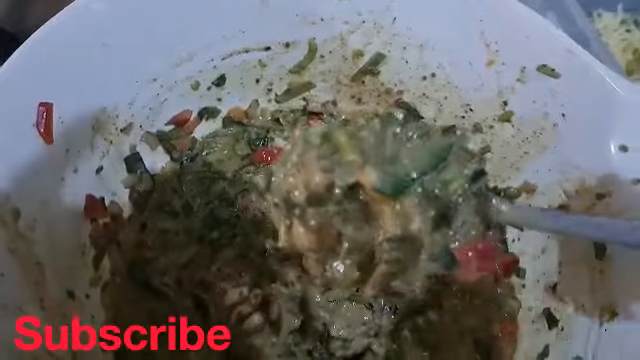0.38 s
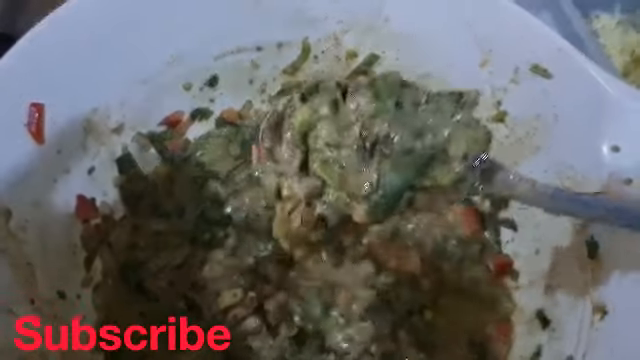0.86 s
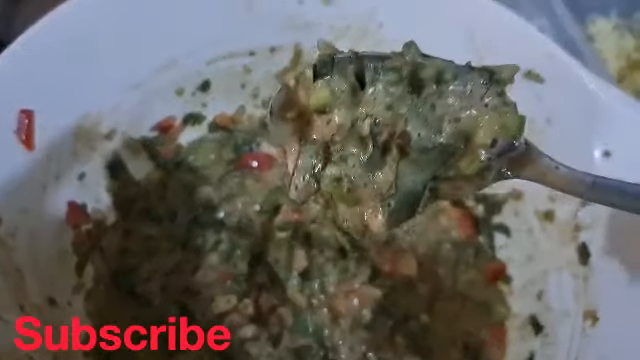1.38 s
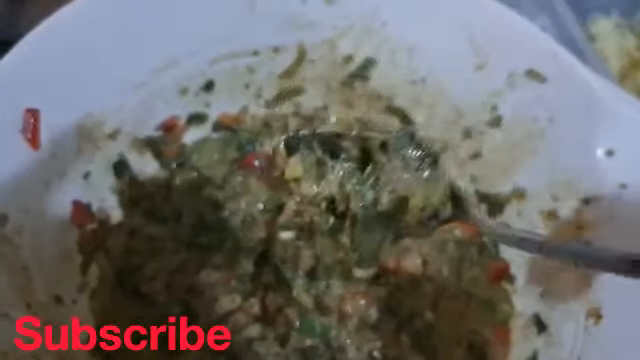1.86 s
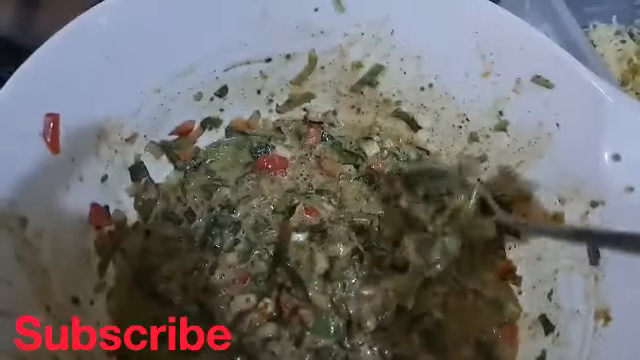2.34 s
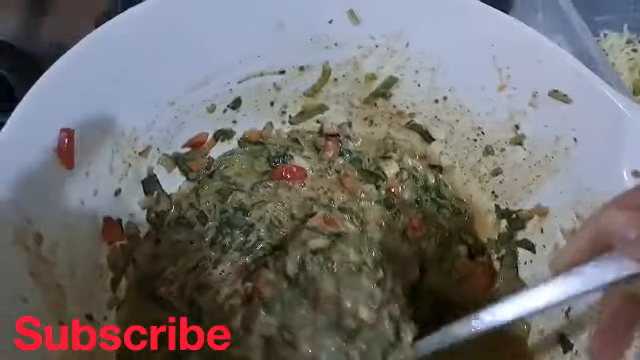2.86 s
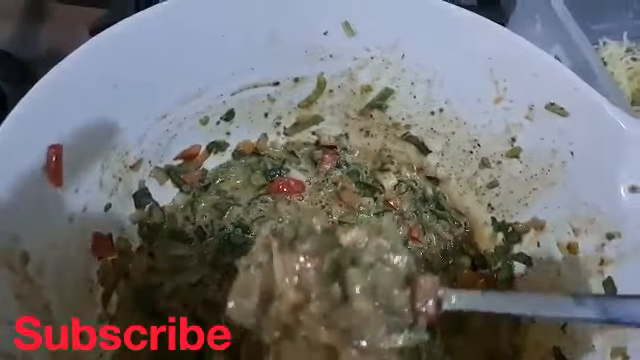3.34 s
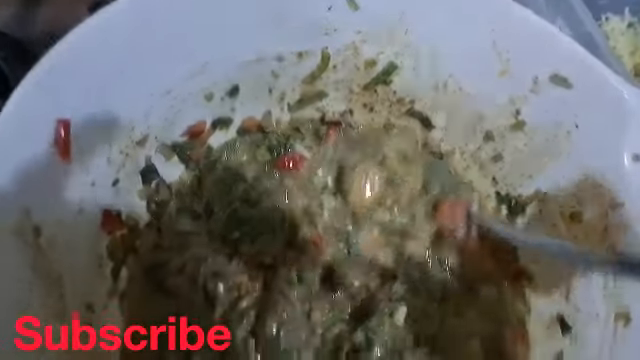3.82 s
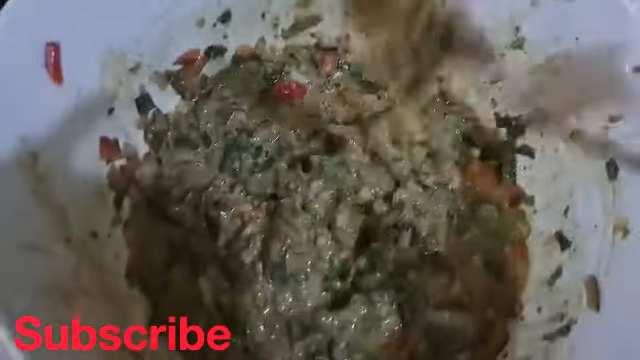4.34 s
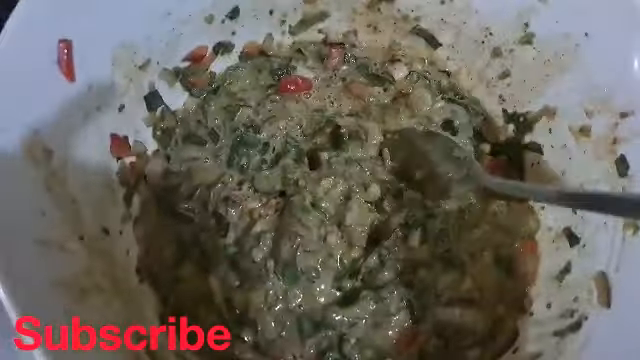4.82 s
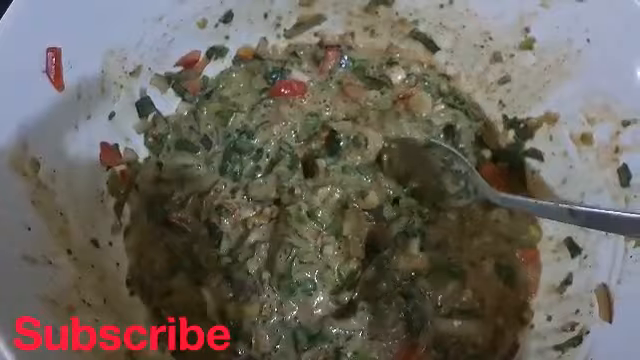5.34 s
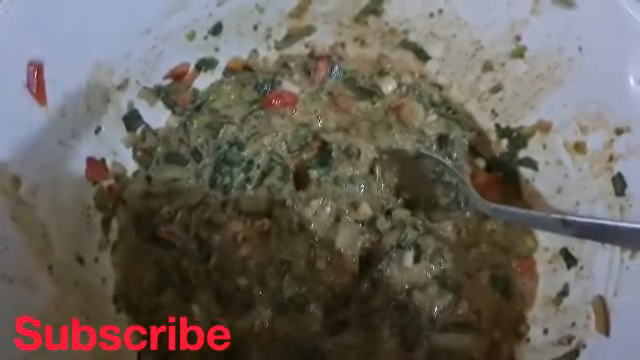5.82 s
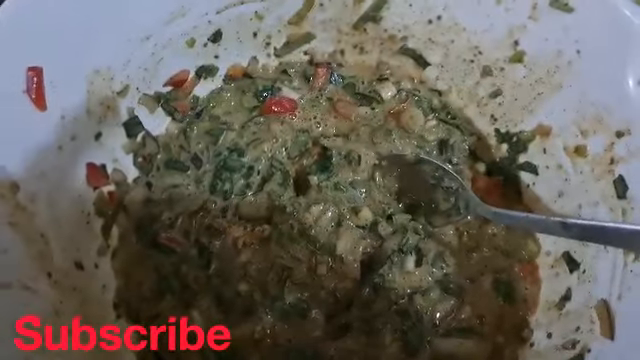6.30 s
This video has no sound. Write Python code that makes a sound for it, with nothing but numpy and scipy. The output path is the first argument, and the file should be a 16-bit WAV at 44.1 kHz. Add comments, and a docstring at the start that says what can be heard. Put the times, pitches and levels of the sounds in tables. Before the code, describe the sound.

Close wet squelching of heavy batter being turned by a metal spoon, faint running-water hiss and fridge hum, then a hard clack and near quiet.

```python
"""A spoon folds thick wet batter in a bowl close to a phone: crowds of short damped grains make soft squelches,
lone pockets ring as plops and sharp snaps tear; a knock and a clink on the bowl ring sets of damped modes.
Farther off, coloured noise hisses like a running tap until something is set down with a clack; a fridge hums.
The two microphone ports hear each source at their own level and time. The sound drops out for an instant
before the clack and ends just before the close."""
import sys
import numpy as np
from scipy import signal
from scipy.fft import rfft, irfft, next_fast_len
from scipy.io import wavfile
from scipy.ndimage import uniform_filter1d, map_coordinates

SR = 44100
rng = np.random.default_rng(int(sys.argv[2]) if len(sys.argv) > 2 else 0)


def store_pcm(level_fs):
    """Save levels as 16-bit WAV."""
    pcm = np.round(np.clip(level_fs, -1, 1) * 32767).astype(np.int16)
    wavfile.write(sys.argv[1], SR, np.atleast_2d(pcm).T)


def voltage_ratio(decibels):
    """Convert decibels (scalar or array-like) to amplitude ratios, 20 dB per decade."""
    exponent = np.asarray(decibels, float) / 20
    return 10 ** exponent


N = 295189

# Kitchen noise colour: (frequency [Hz], relative gain [dB])
KITCHEN_COLOUR = [(290, -32), (500, -21.5), (553, -0.5), (640, -40.5), (750, -24.5), (960, -31.5),
                  (1420, -5.5), (1770, -10.5), (2070, -4), (2700, -24.5), (3500, -39), (4500, -22),
                  (7310, -15.5), (12700, -12.5), (16000, -21)]
# Rumble band, then hum band: (centre [Hz], half width to 1/e [Hz])
HUM_BANDS = [(58, 21), (101, 8.9)]
# Dull bumps through the worktop: (time of peak [s], level [dB], fall t60 [s])
BUMPS = [(1.25, -48, 0.5), (1.84, -46.5, 0.19), (3.12, -56, 0.73), (3.64, -56, 0.44), (4.3, -58.5, 0.5),
         (5.27, -56, 0.28), (6.5, -49.5, 0.81)]
# One deep thud of the worktop: (time of peak [s], level [dB], frequency [Hz], Gaussian half width [s])
WORKTOP_THUD = (5.017, -34, 58.5, .028)
# Flow of the tap: (time [s], hiss level [dB], splash level over the hiss [dB])
TAP_FLOW = [(0, -54, -4.5), (.15, -53, -14.5), (.76, -51, -9.5), (1.15, -53.5, -11), (1.205, -45.5, -7.5),
            (1.29, -47, -3.5), (1.39, -47.5, -5), (1.54, -53.5, -8.5), (3.0, -54.5, -17),
            (3.07, -49.5, -7.5), (3.4, -55, -10.5), (5.36, -55.5, -27), (5.44, -71.5, -16),
            (5.6, -78.5, -20)]
# Colour of the tap's hiss, and of the spits: (frequency [Hz], relative gain [dB])
HISS_COLOUR = [(710, -62.5), (1200, -12.5), (1770, -3), (3950, -6.5), (6800, -0.5), (10500, -5),
               (12600, -5), (15000, -1), (16000, -60)]
# Narrow bands in the hiss: (centre [Hz], half width [Hz], boost [dB])
WHISTLES = [(1827, 18, 8), (6900, 79, 7.5), (11100, 27, 9.5), (12410, 130, 9.5), (13800, 130, -3.5)]
# Colour of the tap's splash: (frequency [Hz], relative gain [dB])
SPLASH_COLOUR = [(500, -23.5), (750, -4.5), (1500, -9), (3300, -7.5), (5500, -6), (9000, -50), (15000, -44)]
# Likeness of the two ports in spread-out noise: (frequency [Hz], left-right likeness [0-1])
PORT_LIKENESS = [(60, 0.94), (130, 0.81), (240, 1), (950, 0.099), (3770, 0.033), (15000, 0.01)]
# Level difference of the microphone ports: (frequency [Hz], left over right [dB])
PORT_BALANCE = [(60, 1), (180, 0), (550, -4), (1650, -1.5), (4970, -4), (15000, 5.5)]
# Decay of the kitchen's answer: (frequency [Hz], t60 [s])
WALL_DECAY = [(200, 0.018), (2000, 0.24), (10000, 0.04)]
# Knock blows: (time [s], level [dB], rattle level over the push [dB], left over right [dB])
KNOCKS = [(2.7948, -36.5, -26.5, 5)]
# Clink blows: (time [s], level [dB], rattle level over the push [dB], left over right [dB])
CLINKS = [(2.9548, -26.5, -20.5, 0.0024), (2.968, -39.5, -25.5, 0)]
# Clack blows: (time [s], level [dB], rattle level over the push [dB], left over right [dB])
CLACKS = [(5.2138, -26, -24, -4.5), (5.2156, -33.5, -24.5, -4.5), (5.2305, -36, -27, -5.5),
          (5.245, -42, -30.5, -7.5), (5.262, -47, -24, -6.5)]
# Broad gritty noise under clink and clack: (time [s], level [dB], rattle over the push [dB], left over right [dB])
CRACKS = [(2.9538, -41, -2.5, 1), (5.214, -35, -2.5, -5), (5.23, -36, -4.5, 0), (5.255, -42.5, -1, -5)]
# Ringing modes of the bowl: (frequency [Hz], relative level [dB], t60 [s])
BOWL_MODES = [(215, -1.5, 0.053), (300, 2, 0.057), (490, 7, 0.036), (595, 7.5, 0.016), (800, 12, 0.018),
              (1160, 1.5, .012), (1580, 9, 0.0073), (1990, -10.5, .015), (1750, -9, 0.04),
              (2450, 1.5, 0.019), (3600, -7.5, 0.0093), (4700, -6.5, 0.0128), (5460, -9.5, 0.0101)]
# Ringing modes of the spoon: (frequency [Hz], relative level [dB], t60 [s])
SPOON_MODES = [(620, -8.5, 0.011), (1100, -16, 0.0051), (1786, -4, 0.03), (1870, 1.5, 0.039),
               (1967, -4.5, 0.049), (2270, -15, .04), (2360, -1, 0.04), (2450, -3, 0.022),
               (2500, -5.5, 0.081), (2660, -8.5, 0.047), (3120, -9, 0.044), (3320, -19, 0.057),
               (3850, -10, 0.013), (4510, -9, 0.046), (5030, -8.5, 0.016), (6170, -25.5, .015),
               (7740, -3, 0.016), (9040, -21, 0.011)]
# Ringing modes of the clack: (frequency [Hz], relative level [dB], t60 [s])
CLACK_MODES = [(298.3, -13, 0.13), (458, -14.5, 0.12), (563, -18, 0.12), (795, -9, 0.15), (920, -13.5, .02),
               (1169, -10, 0.18), (1242, -9, .09), (1383, -10.5, 0.12), (1620, -9, .015),
               (1775, -4.5, 0.071), (1876, -12, .08), (1995, -5.5, 0.063), (2120, -1, 0.039),
               (2340, 8, 0.018), (2450, -25.5, 0.087), (2790, -0.5, 0.015), (3180, 0.5, 0.025),
               (3620, 1.5, 0.018), (3950, 3.5, 0.016), (4400, -3, 0.021), (5220, 2.5, 0.007),
               (6060, -10, 0.008), (7850, 1, 0.0076)]
# Short treble spits as batter slaps or a thing is struck: (time of peak [s], level [dB], fall t60 [s])
SPITS = [(1.95, -53.5, 0.22), (2.09, -55.5, 1), (2.795, -51, 0.21), (2.958, -46, 0.16), (3.62, -51, 0.16),
         (3.88, -47, 0.3), (4.16, -51, 0.12), (5.218, -41.5, 0.18)]
# Heaves of the whole mass of batter: (time of peak [s], level [dB], fall t60 [s])
HEAVES = [(.07, -49.5, 0.24), (1.0, -58.5, 11), (1.3, -60.5, 1.6), (1.75, -52, 0.44), (2.22, -62, 3.9),
          (2.795, -54, 0.79), (3.12, -56, 1.2), (3.4, -59, 0.85), (3.64, -47, 0.21), (3.88, -55, 0.56),
          (4.15, -46, 1.1), (4.43, -62, 27), (5.0, -50.5, 0.42), (5.25, -46, 0.2), (5.44, -59.5, 0.93),
          (5.66, -54.5, 0.2), (5.83, -56.5, 0.24), (6.22, -63, 0.84)]
# Colour of the churning batter: (frequency [Hz], relative gain [dB])
CHURN_COLOUR = [(120, 0.5), (150, 1.5), (200, -7), (320, 1), (480, -5), (620, -18), (1000, -23.5),
                (2500, -50)]
# Sharp wet snaps as the batter tears: (time [s], level [dB])
SNAPS = [(1.32, -48), (1.395, -50), (1.729, -38), (2.071, -43.5), (2.091, -51), (3.599, -33.5),
         (3.861, -41), (3.877, -45), (3.886, -43), (3.95, -41.5), (3.906, -56), (3.925, -55), (4.02, -60),
         (4.05, -44.5), (4.092, -37.5), (4.131, -37.5), (4.137, -35.5), (4.152, -44), (4.166, -48),
         (4.182, -38.5), (4.196, -55), (4.242, -41.5), (4.325, -48)]
# Ringing modes of a snap or crack: (frequency [Hz], relative level [dB], t60 [s])
SNAP_MODES = [(600, -6, 0.0027), (1400, -5, 0.0036), (2430, -8, 0.0016), (3900, -11.5, 0.0023),
              (6000, 0.5, 0.0008)]
# Single large air pockets that burst and ring: (time [s], level [dB], frequency [Hz], t60 [s])
PLOPS = [(1.716, -41, 910, 0.079), (1.73, -35.5, 853, 0.088), (1.737, -32, 425, 0.082),
         (1.746, -30, 417, .04), (1.806, -44, 419, 0.14), (2.078, -45, 401, 0.2),
         (3.142, -41.5, 867, 0.073), (3.146, -42.5, 2634, 0.058), (3.603, -38, 1400, 0.052),
         (3.612, -37, 820, 0.033), (3.613, -46, 1480, 0.036), (3.959, -31.5, 370, 0.06),
         (3.964, -36, 500, 0.078), (3.979, -34.5, 490, 0.074), (4.127, -36, 502, 0.074)]
# Squelches, soft thuds, a rustle, and ticks just before knock and clink:
# (time [s], relative level [dB], middle grain pitch [Hz], pitch spread [octaves], fall t60 [s])
GRAIN_CROWDS = [(0.015, -43, 337, 0.61, 0.36), (0.635, -46, 4400, 0.15, .1), (0.47, -52.5, 526, 0.26, 0.1),
                (1.275, -37.5, 1330, 0.6, 0.59), (1.465, -54.5, 925, 0.29, 0.056),
                (1.489, -54, 1356, 0.11, 0.071), (1.565, -49, 1670, 0.28, 0.17),
                (1.575, -53.5, 850, 0.2, 0.14), (1.74, -38, 800, 0.48, 0.17),
                (1.734, -47, 3300, 0.43, 0.13), (1.724, -46, 1287, 0.28, 0.11),
                (1.741, -51, 215, 0.17, 0.14), (2.076, -34.5, 2090, 0.77, .18),
                (2.538, -60, 977, 0.16, 0.12), (2.787, -39.5, 1100, 1.03, 0.043),
                (2.947, -31.5, 3500, 0.78, 0.045), (3.042, -45, 694, 0.91, 0.057),
                (3.09, -49.5, 2047, 0.072, 0.2), (3.165, -48.5, 1000, .3, .08),
                (3.607, -38, 1400, 0.26, 0.088), (3.62, -40, 710, 0.91, 0.14),
                (3.643, -51, 1240, 0.22, 0.15), (3.865, -26, 1714, 1.98, 0.18), (3.871, -45, 303, 0.77, .2),
                (3.91, -35.5, 697, 0.98, 0.4), (4.02, -42, 497, 0.63, 0.23), (4.091, -41, 1000, 0.75, 0.13),
                (4.128, -32, 1600, 0.82, 0.17), (4.182, -38, 910, 0.99, 0.2), (4.324, -45, 452, 1, 0.12),
                (4.999, -45, 246, 0.44, 0.17), (5.451, -51.5, 337, 0.71, 0.26), (5.511, -56, 250, 0.47, .1),
                (5.802, -59.5, 237, 0.75, 0.23), (5.845, -55, 195, .6, .12),
                (6.229, -48.5, 707, 0.85, 0.15)]

RUMBLE_DB, HUM_DB, HUM_TONE_DB, CHURN_DB, KITCHEN_DB = -65.5, -63, -66, -72.5, -69.0  # levels before wobble
SPIT_RISE, HEAVE_RISE, BUMP_RISE = 0.27, 0.68, 0.41  # rise time over fall time
CROWD_RISE_S, SLOWER_WHEN_LOW = 0.014, 0.3  # crowd's rise at 1 kHz; power by which lower ones rise slower
PLOP_RISE_S, PLOP_WANDER = 0.0015, 0.027  # build-up time; share by which the pitch wanders
CONTACT_S = 0.00016  # how fast a blow builds up
BATTER_LEAD_S, ROOM_LEAD_S = 0.00033, 0.00047  # head start of the left port: batter, spread-out noise
DROPOUT_START_S, DROPOUT_END_S, END_S = 5.2005, 5.2065, 6.568


def unit(x):
    """Scale so that the mean of the channels has rms 1."""
    return x / np.sqrt(np.mean(np.mean(x, axis=0) ** 2) + 1e-20)


def along(points, hz):
    """Interpolate (frequency, value) points on a log frequency axis."""
    f, v = np.transpose(points)
    return np.interp(np.log(hz + 1), np.log(f + 1), v)


def curves(rows):
    """One value per sample for each column after the time."""
    s, *cols = np.transpose(rows)
    return [np.interp(np.arange(N) / SR, s, c) for c in cols]


def wobble(rate):
    """A smooth random curve, rate knots a second (100 at most)."""
    knots = rng.standard_normal(N // 400)
    return map_coordinates(knots, [np.arange(N) * min(rate, 100) / SR])


def swells(rows, rise):
    """Gain that climbs to each row's peak and dies away after it; the powers add."""
    s, db, fall = np.transpose(rows)[..., None]
    late = np.arange(N) / SR - s
    distance = np.where(late < 0, -late / rise, late)
    return np.sqrt(np.sum(voltage_ratio(db - 60 * distance / fall) ** 2, axis=0))


def filtered(x, response):
    """x times a complex response of frequency."""
    m = next_fast_len(N + SR // 2)
    return irfft(rfft(x, m) * response(np.fft.rfftfreq(m, 1 / SR)), m)[..., :N]


def placed(x, pan_db, lead):
    """A place before the microphone: left louder by pan_db and earlier by lead seconds."""
    shift = lambda hz: np.exp(1j * np.pi * hz * lead * np.array([[1], [-1]]))
    return filtered(x, shift) * voltage_ratio([[pan_db / 2], [-pan_db / 2]])


def rush(gain, patchy_db):
    """Stereo noise of rms 1 with patches of random gain, less alike in the ports where the table says so."""
    z = signal.stft(rng.standard_normal((2, N)), nperseg=512)[2]
    field = rng.standard_normal(z.shape[1:])
    field = uniform_filter1d(field, size=5, axis=0)  # over frequency
    field = uniform_filter1d(field, size=10, axis=1)  # over time
    pair = signal.istft(z * voltage_ratio(patchy_db * field / field.std()), nperseg=512)[1][:, :N]
    turn = lambda hz: np.arccos(np.clip(along(PORT_LIKENESS, hz), -1, 1)) / 2
    mid, side = filtered(pair, lambda hz: gain(hz) * [np.cos(turn(hz)), np.sin(turn(hz))])
    return unit(placed(np.array([mid + side, mid - side]), 0, ROOM_LEAD_S))


def coloured(points, patchy_db):
    """Patchy stereo noise with the colour of a table."""
    return rush(lambda hz: voltage_ratio(along(points, hz)), patchy_db)


def band_noise(centre, width):
    """Patchy stereo noise in one Gaussian band."""
    return rush(lambda hz: np.exp(-((hz - centre) / width) ** 2), patchy_db=3.5)


def walls(x):
    """The kitchen's answer, 80 samples late: a noise tail whose every frequency dies at its own speed."""
    hz, t, z = signal.stft(rng.standard_normal((2, SR // 2)), SR, nperseg=256)
    decay = voltage_ratio(-60 * t / along(WALL_DECAY, hz)[:, None])
    tail = signal.istft(z * decay, SR, nperseg=256)[1]
    tail = tail / np.linalg.norm(tail[0])
    return signal.fftconvolve(np.pad(x, (80, 0))[None], tail, axes=1)[:, :N]


def kitchen_noise():
    """Steady room noise with fixed resonant colour."""
    return voltage_ratio(KITCHEN_DB) * coloured(KITCHEN_COLOUR, patchy_db=-3.0)


def worktop_rumble():
    """Low band of noise that swells with each dull bump."""
    gain = np.hypot(voltage_ratio(RUMBLE_DB + 1.7 * wobble(21.0)), swells(BUMPS, BUMP_RISE))
    return gain * band_noise(*HUM_BANDS[0])


def fridge_hum():
    """An unsteady motor hum: a narrow noise band around a sine core of wandering pitch."""
    noise = voltage_ratio(HUM_DB + 2.5 * wobble(5.4)) * band_noise(*HUM_BANDS[1])
    pitch = HUM_BANDS[1][0] + 3 * wobble(7.3)
    tone = np.sqrt(2) * np.sin(2 * np.pi * np.cumsum(pitch) / SR)
    return noise + voltage_ratio(HUM_TONE_DB + 3.0 * wobble(4)) * tone


def thud():
    """The worktop swings a few times at a low pitch under a Gaussian swell."""
    s, db, hz, width = WORKTOP_THUD
    t = np.arange(N) / SR - s
    return voltage_ratio(db) * np.exp(-(t / width) ** 2 / 2) * np.cos(2 * np.pi * hz * t)


def tap():
    """Turbulent hiss with narrow whistling bands; a lower splash swells with it."""
    hiss_db, over_db = curves(TAP_FLOW)
    whistle_db = lambda hz: sum(db * np.exp(-((hz - c) / w) ** 2) for c, w, db in WHISTLES)
    colour = lambda hz: voltage_ratio(along(HISS_COLOUR, hz) + whistle_db(hz))
    hiss = voltage_ratio(hiss_db + 1.3 * wobble(6.4)) * rush(colour, patchy_db=2.0)
    splash = voltage_ratio(hiss_db + over_db + 1.2 * wobble(30)) * coloured(SPLASH_COLOUR, patchy_db=3.5)
    return hiss + splash


def struck(blows, modes, rattle_t60, wet_db, lead, waver=0.02):
    """Every blow is one push and a dying rattle; both ring the same modes, whose pitch wavers."""
    t = np.arange(SR // 2) / SR
    ring = np.zeros(len(t))
    for k, (hz, level, t60) in enumerate(modes):
        turns = hz * np.cumsum(1 + waver * wobble(90)[:len(t)]) / SR
        ring += (-1) ** k * voltage_ratio(level - 60 * t / t60) * np.sin(2 * np.pi * turns)
    ring = ring * (1 - np.exp(-t / CONTACT_S))
    force = np.zeros((2, N + SR))
    for s, db, rattle_db, pan_db in blows:
        push = voltage_ratio(rattle_db - 60 * t / rattle_t60) * rng.standard_normal(len(t))
        push[0] = 1  # the push itself, ahead of the rattle
        pan = voltage_ratio([[pan_db / 2], [-pan_db / 2]])
        force[:, round(s * SR):][:, :len(t)] += voltage_ratio(db) * push * pan
    near = signal.fftconvolve(force, ring[None], axes=1)[:, :N]
    return placed(near, 0, lead) + voltage_ratio(wet_db) * walls(near.mean(axis=0))


def clack():
    """Something is set down: a few blows in quick succession on one set of modes."""
    return struck(CLACKS, CLACK_MODES, rattle_t60=0.034, wet_db=-9.5, lead=-0.00017, waver=0.017)


def cracks():
    """Gritty noise under clink and clack: a strong rattle on very short modes."""
    return struck(CRACKS, SNAP_MODES, rattle_t60=0.061, wet_db=-5.5, lead=-0.00011)


def knock():
    """A blow on the bowl rings its low, short modes."""
    return struck(KNOCKS, BOWL_MODES, rattle_t60=0.02, wet_db=-11.5, lead=-0.000018)


def clink():
    """The spoon meets the bowl and rings its higher modes."""
    return struck(CLINKS, SPOON_MODES, rattle_t60=0.016, wet_db=-11, lead=-0.000052, waver=0.012)


def spits():
    """Brief bright noise thrown off by each slap and blow."""
    return swells(SPITS, SPIT_RISE) * coloured(HISS_COLOUR, patchy_db=2.0)


def churn():
    """Low lumpy noise of the batter's mass, swelling with each heave."""
    heave = np.hypot(voltage_ratio(CHURN_DB + 1.1 * wobble(10)), swells(HEAVES, HEAVE_RISE))
    return heave * voltage_ratio(0.44 * wobble(41)) * coloured(CHURN_COLOUR, patchy_db=1.6)


def snaps():
    """Tearing batter: a push and a noisy rattle on very short modes."""
    blows = [(s, db, -9, -2) for s, db in SNAPS]
    return struck(blows, SNAP_MODES, rattle_t60=0.045, wet_db=2, lead=BATTER_LEAD_S)


def plops(wet_db):
    """A lone pocket rings on one slightly unsteady pitch."""
    out, t = np.zeros(N + SR), np.arange(SR // 4) / SR
    for s, db, hz, t60 in PLOPS:
        pitch = hz * (1 + PLOP_WANDER * wobble(55)[:len(t)])
        envelope = voltage_ratio(db - 60 * t / t60) * (1 - np.exp(-t / PLOP_RISE_S))
        out[round(s * SR):][:len(t)] += envelope * np.sin(2 * np.pi * np.cumsum(pitch) / SR)
    return placed(out[:N], pan_db=-3.5, lead=BATTER_LEAD_S) + voltage_ratio(wet_db) * walls(out[:N])


def grain_crowds(turns, scatter_db, wet_db):
    """Squelches, soft thuds, a rustle and ticks: crowds of short damped grains; alike grains ring longer."""
    out, t = np.zeros(N + SR), np.arange(SR // 20) / SR
    for s, db, hz, spread, fall in GRAIN_CROWDS:
        rise = CROWD_RISE_S * (hz / 1000) ** -SLOWER_WHEN_LOW
        late = rng.random(size=320) * (rise + fall / 2) - rise
        pitch, size = rng.standard_normal(size=(2, 320))
        swell = np.where(late < 0, np.abs(1 + late / rise) ** 0.5, voltage_ratio(-60 * late / fall))
        f = np.clip(hz * 2 ** (spread * pitch), 45, 14000)[:, None]
        decay = np.exp(-f * t * spread / turns)
        shape = np.sin(2 * np.pi * f * t) * decay * (1 - np.exp(-3 * f * t))
        loudness = voltage_ratio(db + scatter_db * (np.tanh(size / 2) * 2 - 3.5)) * swell
        # The root evens the strength of low and high grains, since low ones ring longer
        grains = loudness[:, None] * shape * np.sqrt(f / hz)
        start = np.maximum(np.round((s + late) * SR), 0).astype(int)
        places = start[:, None] + np.arange(len(t))
        out += np.bincount(places.ravel(), grains.ravel(), len(out))
    return placed(out[:N], pan_db=-3.0, lead=BATTER_LEAD_S) + voltage_ratio(wet_db) * walls(out[:N])


def scene():
    """Kitchen, tap, struck things and the batter close by, all together."""
    background = kitchen_noise() + worktop_rumble() + fridge_hum() + thud() + tap()
    blows = clack() + cracks() + knock() + clink() + spits()
    batter = churn() + snaps() + plops(wet_db=-1.5) + grain_crowds(turns=2.0, scatter_db=4.5, wet_db=-1.0)
    return background + blows + batter


def top_cut(x):
    """Nothing passes above the cut-off."""
    return signal.sosfilt(signal.butter(12, 16320, fs=SR, output="sos"), x)


def record(dry):
    """Unequal microphone ports with a bass cut; a few milliseconds go missing and the end is silent."""
    t = np.arange(N) / SR
    balance = lambda hz: voltage_ratio(along(PORT_BALANCE, hz) / 2 * np.array([[1], [-1]]))
    ports = lambda hz: balance(hz) / (1 + (42 / (hz + 1)) ** 4)
    outside = np.maximum(DROPOUT_START_S - t, t - DROPOUT_END_S)
    gap = np.clip(outside / 0.003, 0, 1)  # 3 ms ramps on both sides
    fade = voltage_ratio(-np.clip((t - END_S) / 0.0028, 0, 1) * 54.5) * (t < END_S + 0.03)
    return top_cut(filtered(dry, ports) * gap * fade)


dry = scene()
out = record(dry)
store_pcm(out)
```